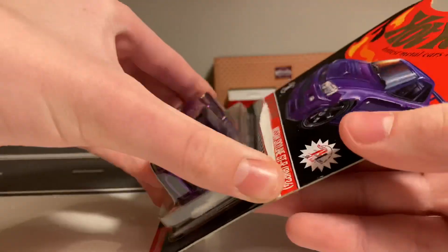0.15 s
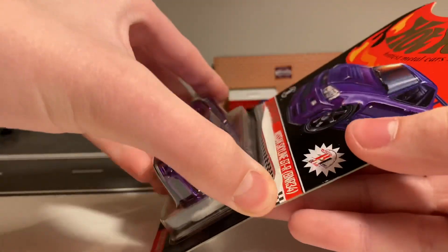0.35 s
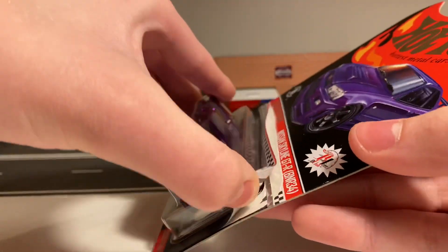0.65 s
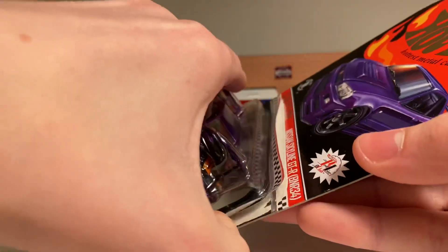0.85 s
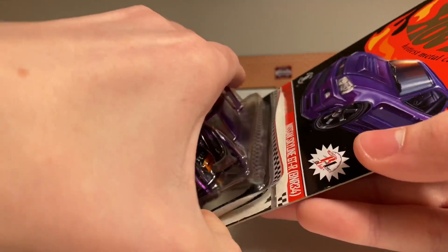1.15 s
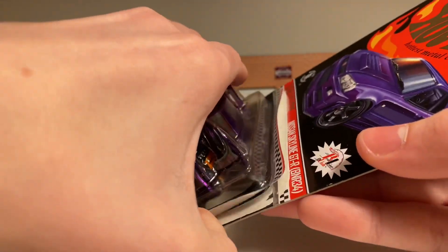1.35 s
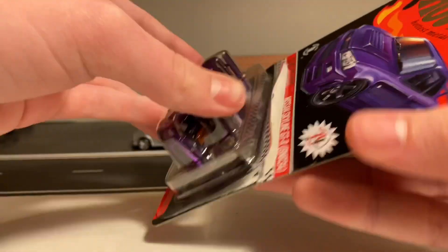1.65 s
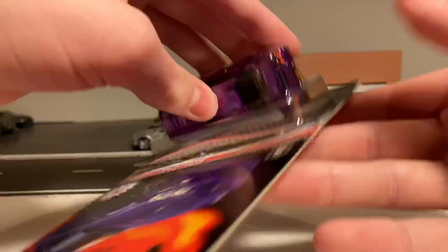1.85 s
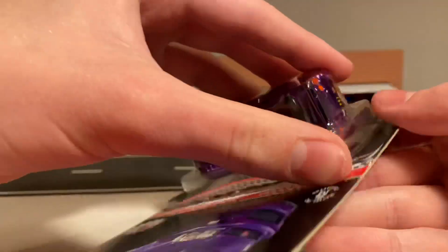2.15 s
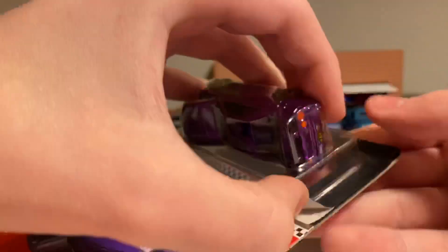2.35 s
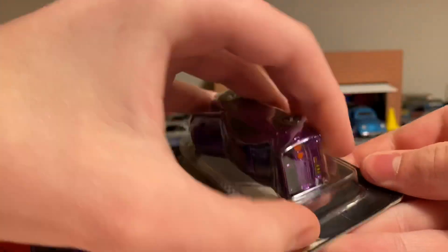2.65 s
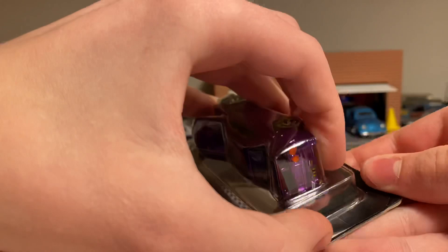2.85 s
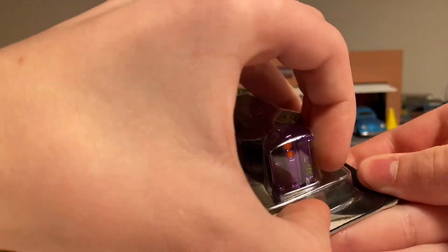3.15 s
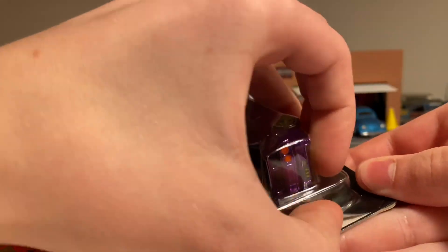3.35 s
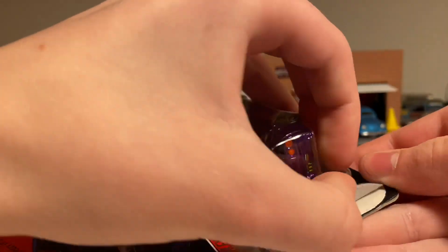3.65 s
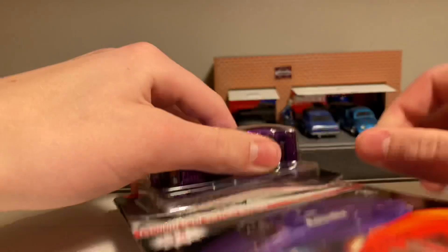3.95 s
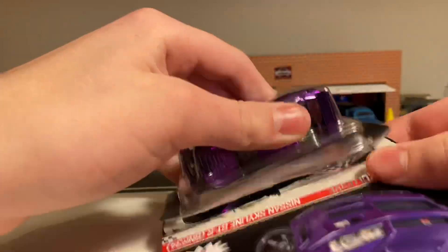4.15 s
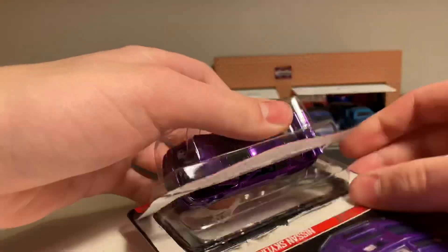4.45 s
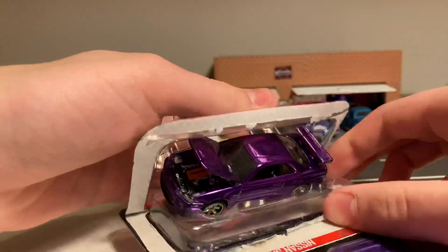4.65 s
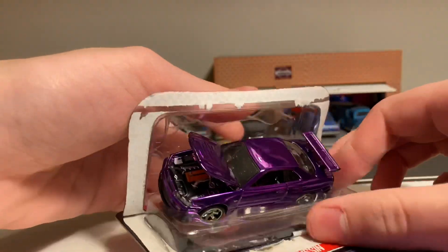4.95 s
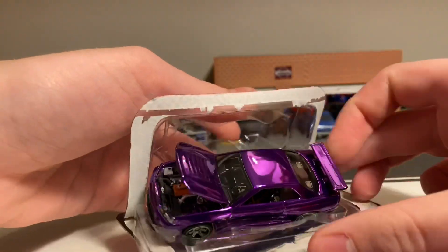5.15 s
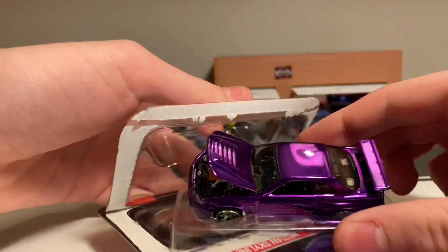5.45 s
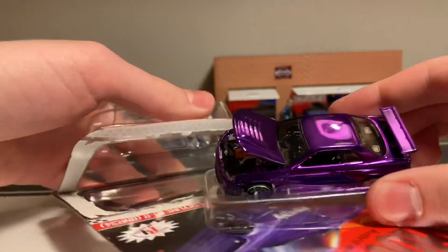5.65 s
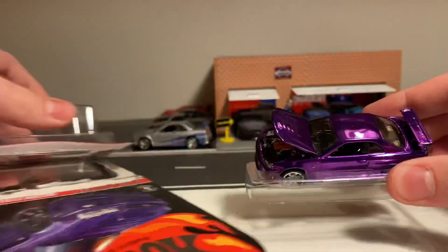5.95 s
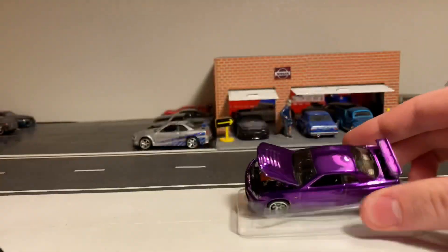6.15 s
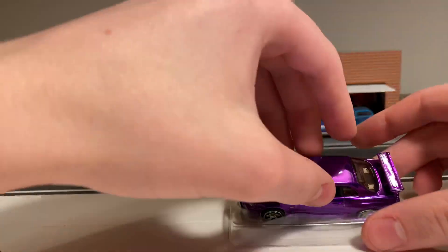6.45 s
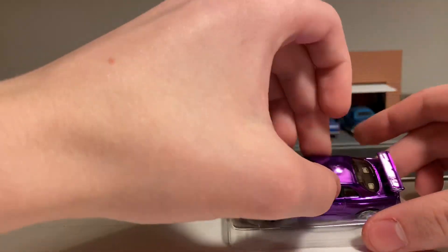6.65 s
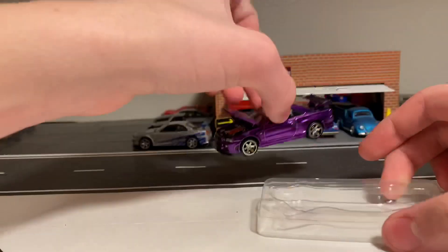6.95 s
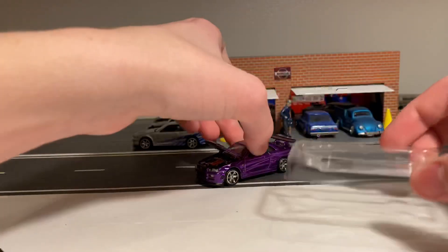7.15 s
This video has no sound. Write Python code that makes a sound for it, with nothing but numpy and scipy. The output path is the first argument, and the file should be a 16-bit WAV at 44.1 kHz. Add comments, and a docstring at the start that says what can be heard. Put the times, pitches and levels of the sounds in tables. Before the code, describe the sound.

Stiff plastic packaging crackles, snaps and tears off cardboard up close, then a tray slides out and a toy car clicks down.

```python
"""A stiff plastic blister is pried off its card, close to a two-port microphone.
The shell snaps as it buckles and the glue lets go; fingers and card rub over it in stick-slip strokes.
The tray slides out and a die-cast toy car is set down, ringing as its wheels land.
Wrists and car thud on the desk. Faint fan hum and hiss fill the quiet room."""
import sys
import numpy as np
from scipy import signal
from scipy.fft import rfft, irfft, next_fast_len
from scipy.io import wavfile

SR = 44100
rng = np.random.default_rng(int(sys.argv[2]) if len(sys.argv) > 2 else 0)


def digitize_waveform(pressure):
    """Quantize a signal to 16-bit integers and store it at the path in sys.argv[1].

    Rows of a 2-D input are taken as channels; values are limited to [-1, 1].
    """
    field = np.atleast_2d(pressure).T
    bounded = np.clip(field, -1, 1)
    quanta = np.round(bounded * 32767).astype(np.int16)
    wavfile.write(sys.argv[1], SR, quanta)


N = 322371

# shell snaps: t/s, shell level/dB, crack level/dB, card level/dB, crack f/Hz
SNAP_EVENTS = [(0.2489, -51.5, -46.5, -63, 4000), (0.3885, -48, -28, -71, 7400),
               (0.6416, -32, -37, -71, 4730), (0.722, -19.5, -18.5, -48.5, 5530),
               (0.7692, -29.5, -30, -72, 4500), (1.0003, -41.5, -37, -62, 5900),
               (1.0566, -37, -37, -90, 4560), (1.2224, -60, -38.5, -61, 5330),
               (1.438, -52, -58, -61.5, 4500), (1.4708, -28, -30, -66, 5300), (1.4857, -36, -34, -54, 4400),
               (1.5863, -47, -43, -63, 5300), (1.628, -36, -39, -50, 4600), (1.6386, -37, -34, -43, 4700),
               (1.662, -23.5, -22.5, -40, 5200), (1.697, -38, -53, -62, 4500), (1.717, -34, -46, -60, 4500),
               (1.8235, -32.5, -29, -49, 6700), (1.9472, -41.5, -33.5, -53.5, 5900),
               (2.082, -44, -50, -61, 4500), (2.183, -28.5, -24.5, -59, 4450),
               (2.2785, -41, -37, -51.5, 4640), (2.3101, -37, -28, -62, 4700),
               (2.345, -36.5, -61, -75, 4600), (2.3975, -40.5, -58, -55, 5000),
               (2.5458, -24.5, -23, -52, 5900), (2.585, -46.5, -36, -91, 6750),
               (2.783, -38, -31.5, -59, 4870), (2.934, -49, -66, -80, 4000), (2.984, -38, -36.5, -57, 5900),
               (3.124, -78, -40.5, -74, 11600), (3.196, -68, -40, -60.5, 5800),
               (3.3546, -38, -31.5, -58, 11000), (3.418, -47, -60, -66, 6000), (3.608, -45, -33, -71, 9200),
               (3.6711, -38.5, -34, -50.5, 5500), (3.7402, -34, -55, -61, 4200),
               (3.8081, -22, -32, -54, 5440), (3.8674, -26, -19, -35, 5160), (3.886, -29, -33, -31, 6600),
               (3.891, -31, -28, -53, 5660), (3.933, -32.5, -40, -36, 4200), (4.0435, -33, -43, -49, 4280),
               (4.0801, -29.5, -42, -42, 4200), (4.1026, -32, -29, -32, 5150),
               (4.1146, -30, -17, -31, 4700), (4.1239, -9, -8.5, -26, 4600), (4.1284, -5, -20, -16, 4600),
               (4.168, -35, -32.5, -49, 5900), (4.204, -53, -27, -59, 4800),
               (4.2151, -26, -29.5, -48, 7060), (4.2377, -52, -31, -41.5, 6050),
               (4.2504, -21.5, -29, -46, 6600), (4.2854, -11, -14, -34, 4160),
               (4.308, -60, -59, -38.5, 5000), (4.3178, -27.5, -24, -47, 6050),
               (4.3652, -53, -39, -32.5, 3700), (4.3766, -21, -18, -43, 5470),
               (4.4052, -55, -30, -61, 6740), (4.4324, -55, -27.5, -59, 6100),
               (4.4592, -37, -24, -48, 5300), (4.4785, -33, -28.5, -44, 6860),
               (4.557, -22, -23.5, -36.5, 4560), (4.7232, -38.5, -39.5, -55, 7800),
               (4.777, -38.5, -40.5, -48, 4400), (4.833, -30, -26.5, -81, 6960),
               (4.9187, -27.5, -19.5, -64, 6200), (4.9338, -32, -14, -70, 6060),
               (4.9465, -32, -20, -78, 7600), (4.953, -25, -15, -69, 8500), (4.9608, -22.5, -26, -76, 8600),
               (4.9647, -22, -13, -66, 8600), (4.9762, -23.5, -11.5, -39, 7760),
               (5.007, -19.5, -9.5, -40, 7700), (5.113, -36, -41, -53.5, 4230),
               (5.273, -34, -34.5, -80, 6700), (5.3022, -31.5, -30.5, -85, 7760),
               (5.3563, -41.5, -35, -77.5, 5680), (5.9831, -45, -43.5, -54, 4000),
               (6.0439, -42, -35.5, -58.5, 6430), (6.0765, -37, -29, -38, 5160),
               (6.0793, -22.5, -45, -30, 5000), (6.0849, -47, -50, -61, 4670),
               (6.1284, -45, -34.5, -65.5, 6750), (6.602, -71, -53, -89, 5810),
               (6.7045, -67, -47, -85.5, 5010), (7.209, -56.5, -47, -78.5, 8420)]
# shell modes: f/Hz, level/dB, t60/s
SHELL_MODES = [(1307, -3, 0.026), (1449, -8, 0.033), (1705, -2.5, 0.011), (1938.5, -0.5, 0.012),
               (2150, -3.5, 0.018), (2480, 3.5, 0.011), (2930, 3.5, 0.013), (3725, -8, 0.028)]
# card modes: f/Hz, level/dB, t60/s
CARD_MODES = [(330, 0, 0.0099), (483, -3, 0.025), (599, -2, 0.03), (892, 2.5, 0.018)]
# spectrum of cracks and skin hiss: f/Hz, level/dB
CREASE_SPECTRUM = [(3000, -6.5), (4500, -1.5), (6200, 0), (8100, 0), (10000, -5), (13000, -9.5),
                   (15600, -9.5)]
# resonance of the hollow between shell, card and palm: t/s, f/Hz
HOLLOW_PITCH = [(0, 2003), (0.64, 2250), (0.72, 1880), (3.7, 1894), (3.81, 1475), (3.866, 2289),
                (4.128, 1808), (4.214, 1305), (4.285, 2053), (4.376, 1450), (4.45, 2100), (4.92, 1802),
                (5.3, 1456), (5.8, 2135), (6.076, 2000), (6.08, 1500), (7.31, 2100)]
# skin and card strokes: t/s, length/s, rub level/dB, hiss level/dB, sag over the stroke/dB
RUB_STROKES = [(0.0, 0.14, -50.5, -53, 16.5), (0.156, 0.015, -53, -53.5, 11.5),
               (0.333, 0.023, -64.5, -72, -4.5), (0.372, 0.06, -54, -46, 12), (0.592, 0.095, -67, -75.5, 7),
               (0.719, 0.065, -61.5, -64, -9), (0.882, 0.07, -69, -61, 0), (1.003, 0.22, -57, -57, 36),
               (1.118, 0.036, -63, -53.5, 6), (1.222, 0.023, -58, -62, 16.5),
               (1.321, 0.058, -68, -58.5, -8), (1.461, 0.061, -52, -56, 6.5), (1.586, 0.11, -56, -63, 3),
               (1.727, 0.037, -56, -63, 19.5), (1.817, 0.024, -48.5, -54.5, -3.5),
               (1.881, 0.079, -50, -50, 5.5), (1.954, 0.014, -66, -46, 26), (1.984, 0.045, -59.5, -53, 8),
               (2.042, 0.022, -46.5, -49, 10.5), (2.096, 0.061, -57, -57, 8.5),
               (2.178, 0.072, -61, -58, -7.5), (2.272, 0.18, -52, -50, 22), (2.443, 0.096, -50, -47, 33),
               (2.546, 0.15, -59.5, -54.5, 9.5), (2.644, 0.061, -76.5, -71, -20.5),
               (2.782, 0.024, -48, -49, 11), (2.844, 0.21, -59, -58, 18.5), (3.072, 0.064, -59, -56.5, 14),
               (3.198, 0.014, -55, -50, 7.5), (3.283, 0.083, -68, -60, -7.5), (3.347, 0.016, -50, -40, 18),
               (3.413, 0.072, -61.5, -59.5, -4.5), (3.526, 0.041, -65.5, -58, -5.5),
               (3.639, 0.06, -57.5, -55, -6), (3.719, 0.11, -60, -54.5, -15), (3.872, 0.049, -38, -41, 20),
               (3.929, 0.11, -64.5, -53, 6), (4.015, 0.047, -64, -59.5, -17),
               (4.082, 0.097, -52.5, -66.5, -8.5), (4.211, 0.25, -49, -57.5, -6.5),
               (4.36, 0.18, -46, -47, 11), (4.55, 0.033, -34.5, -38, 15.5), (4.606, 0.028, -50, -58, -3.5),
               (4.686, 0.13, -53, -58, 9), (4.832, 0.014, -48, -47.5, 0.5),
               (4.895, 0.091, -49.5, -50.5, -11), (5.003, 0.07, -42.5, -39, 24.5),
               (5.111, 0.083, -56, -58.5, 20), (5.17, 0.093, -59, -60.5, -3),
               (5.257, 0.056, -49.5, -45, -2.5), (6.112, 0.031, -60, -61.5, -12.5),
               (6.203, 0.11, -60, -64, 14), (6.647, 0.015, -71, -54, 9.5), (6.794, 0.1, -64, -57.5, 1),
               (6.87, 0.15, -76.5, -63.5, 15), (7.078, 0.044, -49, -44, 22.5),
               (7.257, 0.024, -64, -59.5, 5)]
# tray sliding out: t/s, rub level/dB, hiss level/dB
TRAY_SLIDE = [(5.33, -69, -70), (5.385, -48.5, -45.5), (5.466, -59.5, -52), (5.528, -55.5, -43),
              (5.581, -61.5, -51), (5.636, -62.5, -45.5), (5.68, -64, -54.5), (5.76, -57.5, -46.5),
              (5.809, -55.5, -42.5), (5.867, -76.5, -47), (5.884, -77, -58.5), (5.974, -69, -55.5),
              (5.99, -65, -54), (6.06, -55.5, -48.5), (6.11, -46, -62.5)]
# brightness of the skin hiss: t/s, tilt/(dB/octave)
HISS_TILT = [(0, -3), (0.4, 0), (0.7, -16.5), (0.92, 2), (1.1, -3.5), (1.36, 8.5), (1.6, -10), (1.9, 2.5),
             (2.4, -2), (3.0, 3.5), (3.55, 9), (3.7, 4.5), (4.3, 1.5), (4.95, 0), (5.15, 0), (5.3, 1),
             (5.85, 12.5), (6.25, -9), (6.65, 0.5), (6.85, -11.5), (7.1, 6.5)]
# desk thuds: t/s, level/dB, f/Hz, t60/s
DESK_THUDS = [(0.778, -48.5, 128, 0.057), (1.004, -43.5, 117, 0.086), (1.225, -43.5, 133, 0.077),
              (1.611, -45.5, 130.5, 0.069), (1.663, -42.5, 139, 0.14), (1.935, -47.5, 173, 0.11),
              (1.959, -36.5, 68, 0.023), (3.198, -49.5, 91, 0.022), (3.872, -27, 121, 0.066),
              (3.899, -38, 119.6, 0.16), (3.946, -45.5, 153, 0.18), (4.123, -45.5, 124, 0.16),
              (4.362, -33.5, 156, 0.038), (4.486, -42.5, 114, 0.11), (4.562, -44.5, 182, 0.097),
              (6.052, -42, 237.6, 0.068), (6.082, -50, 202, 0.11), (7.076, -36, 195, 0.11),
              (7.106, -48.5, 114, 0.2)]
# car body modes: f/Hz, level/dB, t60/s
CAR_MODES = [(1371, -9.5, 0.04), (1954, -23.5, 0.044), (2144, 10.5, 0.056), (2685, -6.5, 0.026),
             (4010, 10, 0.028), (4650, 6, 0.017), (8800, 9, 0.0053), (12850, 4.5, 0.005)]
# fan hum: t/s, f/Hz, level/dB
FAN_HUM = [(0, 215, -94), (1.0, 222, -86), (3.3, 248, -83), (7.31, 257, -81)]
# room and preamp hiss: f/Hz, level/dB
AIR_SPECTRUM = [(40, -17), (95, 0.5), (150, -1.5), (300, -12), (1270, -15), (3660, -17), (9000, -21.5),
                (12500, -22), (16500, -45.5)]
# right port response: f/Hz, gain/dB
RIGHT_RESPONSE = [(100, 4.5), (1200, -6), (4400, 5), (8000, -2), (15000, 2.5)]

CREASES_HZ = np.geomspace(3300, 15600, 15)   # modes of the creased plastic
SNAP_PAN_DB, SNAP_SCATTER_DB, RUB_PAN_DB = 3, 2.5, 3
SLIP_WITHIN_S, SLIP_DB = .003, -12
CRACK_WIDTH_OCT, HOLLOW_WIDTH_OCT = .48, .25
CRACK_T60_S, TAIL_T60_S, TAIL_DB = .006, .05, -21
GRIP_DB_PER_S, LIFT_DB_PER_S = 2500, 600
PACK_OPEN_S, TILT_PIVOT_HZ = 5.1, 7000
CAR_S, LAST_TOUCH_DB, TOUCH_GAP_S, TOUCH_STEP_DB = 7.0675, -41, .0016, 2.5
RIGHT_LAG_S, RIGHT_BASS_HZ, BASS_TURN_RAD = .00009, 362, 1.1
AIR_DB, CUTOFF_HZ = -76.5, 16900


def snaps():
    """Buckling rings shell and card and cracks the creases; two weaker slips follow each snap."""
    s, shell_db, crack_db, card_db, crack_hz = np.repeat(SNAP_EVENTS, 3, axis=0).T
    pan_db = SNAP_PAN_DB + SNAP_SCATTER_DB * np.repeat(rng.standard_normal(len(SNAP_EVENTS)), 3)
    is_slip = np.arange(len(s)) % 3 > 0
    s = s + is_slip * rng.uniform(.0004, SLIP_WITHIN_S, len(s))
    shell_db, crack_db, card_db = np.array([shell_db, crack_db, card_db]) + is_slip * SLIP_DB
    at = np.round(s * SR).astype(int)
    held_modes = [(hz, db + 1.5 * hollow_db(hz)[at], t60) for hz, db, t60 in SHELL_MODES]
    shell = struck(held_modes, s, shell_db, pan_db, spread_db=3)
    shell = passed(passed(shell, 1300, "high"), 1300, "high")
    card = struck(CARD_MODES, s, card_db, pan_db, spread_db=4, sign=-1)
    card = passed(passed(card, 300, "high"), 1250, "low")
    crease_modes = []
    for hz in CREASES_HZ:
        off_pitch_db = -6.4 * np.minimum((np.log2(hz / crack_hz) / CRACK_WIDTH_OCT) ** 2, 2.2)
        crease_modes.append((hz, at_hz(CREASE_SPECTRUM, hz) + off_pitch_db, CRACK_T60_S))
    crack = struck(crease_modes, s, crack_db, pan_db, spread_db=3.5, port_spread_db=2.5, sign=-1)
    crack = passed(crack, 2500, "high")
    # desk and wall reflections, different at each port
    crack_tail = decay(strikes(s, crack_db, pan_db), TAIL_T60_S)
    crack_tail *= colour(rng.standard_normal((2, N)), CREASE_SPECTRUM)
    shell_tail = decay(strikes(s, shell_db, pan_db), TAIL_T60_S)
    shell_tail *= damped_shell(rng.standard_normal((2, N)))
    return shell + card + crack + from_db(TAIL_DB) * (crack_tail + from_db(4.5) * shell_tail)


def damped_shell(drive):
    """Drive through the finger-damped shell modes and the hollow; rms 1."""
    rings = sum(from_db(db + hollow_db(hz)) * ring(drive, hz, .9 * t60) * (-1) ** k
                for k, (hz, db, t60) in enumerate(SHELL_MODES))
    return rms_one(passed(rings, 780, "high"))


def hollow_db(hz):
    """Mode gain per sample: the hollow favours modes near its pitch."""
    offset_oct = np.log2(hz / in_time(HOLLOW_PITCH)[0])
    return -4.5 * np.minimum((offset_oct / HOLLOW_WIDTH_OCT) ** 2, 2.5)


def rubbing():
    """Stick-slip grains and parting glue threads excite shell, card and creases."""
    rub_db, hiss_db = stroke_levels_db()
    waver_db = 2.8 * drift(55)
    coarse_noise, fine_noise = rng.standard_normal((2, 2, N))
    glued = np.arange(N) < PACK_OPEN_S * SR
    sliding = ~glued & (np.arange(N) < TRAY_SLIDE[-1][0] * SR)
    tears = glued * grains(300, size_db=3.6)
    coarse = grains(2500, size_db=3) + .6 * coarse_noise + tears
    scuff = sum(from_db(db) * ring(coarse, hz, t60) for hz, db, t60 in CARD_MODES)
    scuff = from_db(-14.5 - 6.1 * ~glued) * rms_one(passed(scuff, 85, "high"))
    rub = from_db(rub_db + waver_db) * (damped_shell(coarse) + scuff)
    fine = grains(5400, size_db=.5) + 1.7 * fine_noise + tears
    hiss = from_db(hiss_db + waver_db) * skin_hiss(fine, sliding)
    return (rub + hiss) * from_db([[RUB_PAN_DB / 2], [-RUB_PAN_DB / 2]])


def skin_hiss(drive, sliding):
    """Fine slips hiss in the creases; the sheen shifts with the grip, the smooth tray is duller."""
    tilt_db_per_oct, = in_time(HISS_TILT)
    hiss, grip = 0, drift(5.9)
    for k, hz in enumerate(CREASES_HZ):
        tilt_db = tilt_db_per_oct * np.clip(np.log2(hz / TILT_PIVOT_HZ), -1, .2)
        sheen_db = 2.6 * np.roll(grip, k * N // len(CREASES_HZ))
        tray_db = -12 * sliding * max(np.log2(hz / 9000), 0)
        gain = from_db(at_hz(CREASE_SPECTRUM, hz) + tilt_db + sheen_db + tray_db)
        hiss = hiss + gain * rms_one(ring(drive, hz, 28 / hz)) * (-1) ** k
    return rms_one(passed(hiss, 2400, "high"))


def stroke_levels_db():
    """Rub and hiss levels: strokes grip, sag or swell, then lift; the tray slide adds in power."""
    t = np.arange(0, N + 32, 32) / SR
    slide_s, *slide_db = np.transpose(TRAY_SLIDE)
    power = 1e-14 + from_db([2 * np.interp(t, slide_s, db, left=-200, right=-200) for db in slide_db])
    for start_s, length_s, rub_db, hiss_db, sag_db in RUB_STROKES:
        shape_db = (-GRIP_DB_PER_S * np.maximum(start_s - t, 0)
                    - sag_db * np.clip((t - start_s) / length_s, 0, 1)
                    - LIFT_DB_PER_S * np.maximum(t - start_s - length_s, 0))
        power += from_db(2 * np.maximum(shape_db + [[rub_db], [hiss_db]], -200))
    return [np.interp(np.arange(N) / SR, t, 10 * np.log10(row)) for row in power]


def desk_thuds():
    """Soft pushes ring the desk at a low, sagging pitch; its upper mode dies first."""
    out = np.zeros(N)
    for s, db, hz, t60 in DESK_THUDS:
        at = round(s * SR)
        t = np.arange(min(SR // 2, N - at)) / SR
        low = np.sin(2 * np.pi * hz * (t + .0033 * (1 - np.exp(-t / .03))))
        upper = from_db(-11.5 - 150 * t / t60) * np.sin(2 * np.pi * 1.9 * hz * t)
        envelope = from_db(db - 60 * t / t60) * (1 - np.exp(-t / .0015))
        out[at:at + len(t)] += envelope * (low + upper)
    rough_db = 3.5 * drift(80) + 2 * np.array([drift(40), drift(40)])   # loose card and skin
    return out * from_db(rough_db) * from_db([[4], [-4]])


def toy_car():
    """Wheels and axles land in six quick touches of rising force, ringing the die-cast body."""
    touch = np.arange(6)
    s = CAR_S + TOUCH_GAP_S * (touch + rng.uniform(-.4, .4, 6))
    db = LAST_TOUCH_DB + TOUCH_STEP_DB * (touch - 5)
    body = struck(CAR_MODES, s, db, pan_db=np.full(6, 3.0), spread_db=2.5)
    return passed(body, 1000, "high")


def room():
    """Unsteady fan hum common to both ports, separate hiss at each."""
    hz, db = in_time(FAN_HUM)
    amplitude = np.sqrt(2) * from_db(db + 3 * drift(6))
    hum = amplitude * np.sin(2 * np.pi * np.cumsum(hz + 4 * drift(12)) / SR)
    return hum + from_db(AIR_DB) * colour(rng.standard_normal((2, N)), AIR_SPECTRUM)


def far_port(x):
    """The right port: later, coloured, bass turned in phase."""
    size = next_fast_len(N + SR // 10)
    hz = np.maximum(np.arange(size // 2 + 1) * SR / size, 1)
    lag_rad = 2 * np.pi * hz * RIGHT_LAG_S + BASS_TURN_RAD * np.exp(-hz / RIGHT_BASS_HZ)
    response = from_db(at_hz(RIGHT_RESPONSE, hz)) * np.exp(-1j * lag_rad)
    return irfft(rfft(x, size) * response, size)[:N]


def struck(modes, s, db, pan_db, spread_db, port_spread_db=1.5, sign=1):
    """Each blow shares its energy unevenly among the modes, a little differently per port."""
    luck = rng.standard_normal((len(s), len(modes), 3))
    share_db = spread_db * luck[:, :, :1] + port_spread_db * luck[:, :, 1:]
    share_db -= 10 * np.log10(np.mean(from_db(2 * share_db), axis=1, keepdims=True))
    return sum(ring(strikes(s, db + mode_db + share_db[:, k].T, pan_db), hz, t60) * sign ** k
               for k, (hz, mode_db, t60) in enumerate(modes))


def strikes(s, db, pan_db):
    """Clicks at times s; rows left, right."""
    out = np.zeros((2, N))
    heights = from_db(db + np.outer([.5, -.5], pan_db))
    np.add.at(out, (slice(None), np.round(s * SR).astype(int)), heights)
    return out


def ring(clicks, hz, t60_s):
    """One mode: a unit click starts a decaying unit sine."""
    r, w = from_db(-60 / (t60_s * SR)), 2 * np.pi * hz / SR
    return signal.lfilter([0, np.sin(w)], [1, -2 * r * np.cos(w), r * r], clicks + 1e-18)


def decay(clicks, t60_s):
    """Envelope that jumps at each click and dies away."""
    return signal.lfilter([1], [1, -from_db(-60 / (t60_s * SR))], clicks + 1e-18)


def grains(per_s, size_db):
    """Random micro-slips of uneven size; rms 1."""
    sizes = from_db(size_db * np.minimum(rng.exponential(1, N), 5)) * rng.choice([-1, 1], N)
    return rms_one(sizes * (rng.random(N) < per_s / SR))


def drift(rate_hz):
    """Slow random wander; rms 1."""
    r = np.exp(-2 * np.pi * rate_hz / SR)
    return rms_one(signal.lfilter([1], [1, -2 * r, r * r], rng.standard_normal(N + SR))[SR:])


def colour(x, spectrum):
    """Shapes x by a spectrum; white noise keeps its rms."""
    size = next_fast_len(N)
    hz, db = np.transpose(spectrum)
    bins_hz = np.maximum(np.arange(size // 2 + 1) * SR / size, 1)
    gain = from_db(np.interp(np.log(bins_hz), np.log(hz), db, left=-60))
    return irfft(rfft(x, size) * rms_one(gain), size)[..., :N]


def at_hz(spectrum, hz):
    """Level/dB, interpolated over log frequency."""
    points_hz, db = np.transpose(spectrum)
    return np.interp(np.log(hz), np.log(points_hz), db)


def in_time(rows):
    """Columns of a curve, one value per sample."""
    s, *columns = np.transpose(rows)
    return [np.interp(np.arange(N) / SR, s, c) for c in columns]


def passed(x, hz, kind):
    return signal.sosfilt(signal.butter(3, hz, kind, fs=SR, output="sos"), x)


def from_db(db):
    return 10 ** (np.asarray(db) / 20)


def rms_one(x):
    return x / np.sqrt(np.mean(x ** 2) + 1e-20)


def scene():
    """Pack, desk and car at two ports, plus the room."""
    left, right = snaps() + rubbing() + desk_thuds() + toy_car()
    return np.array([left, far_port(right)]) + room()


def record(dry):
    """Microphone: bass cut, rounded peaks, steep top cut."""
    rounded = np.tanh(passed(dry, 70, "high"))
    return signal.sosfilt(signal.cheby2(14, 70, CUTOFF_HZ, fs=SR, output="sos"), rounded)


dry = scene()
out = record(dry)
digitize_waveform(out)
```